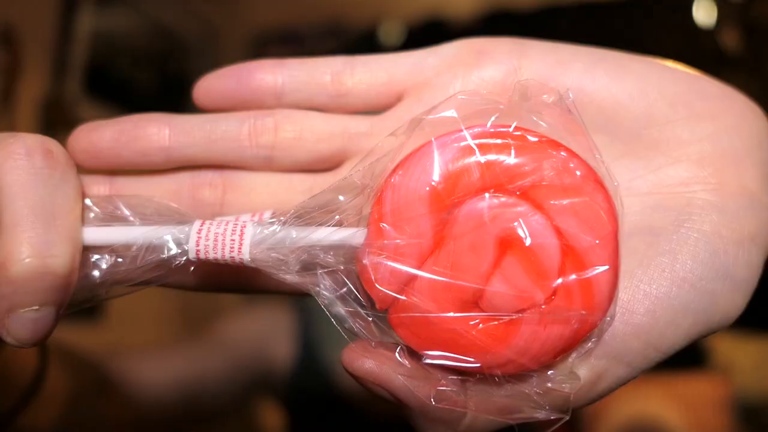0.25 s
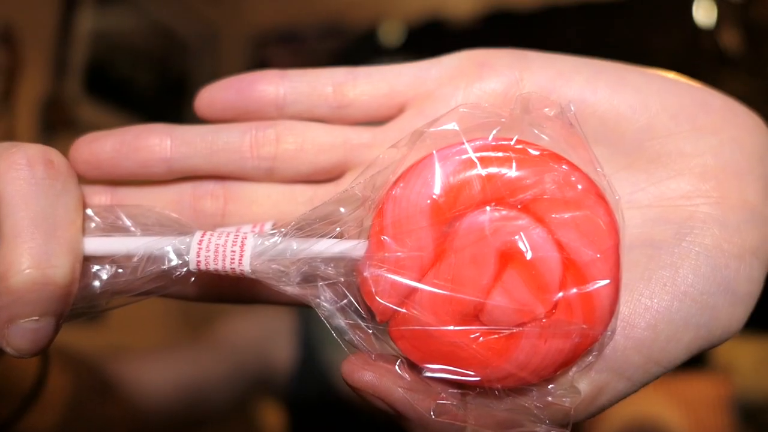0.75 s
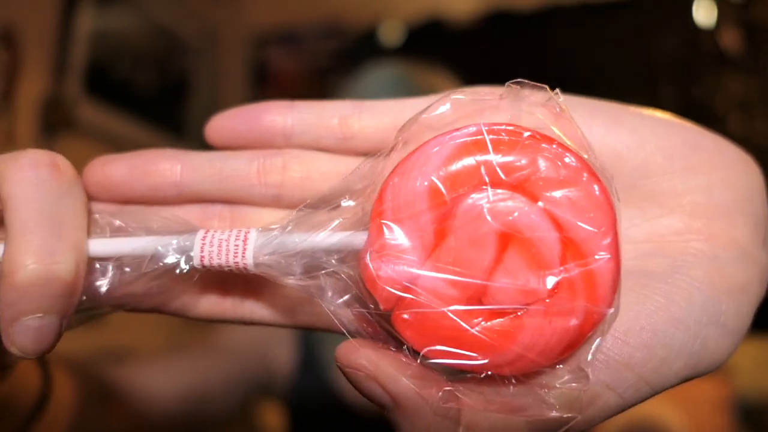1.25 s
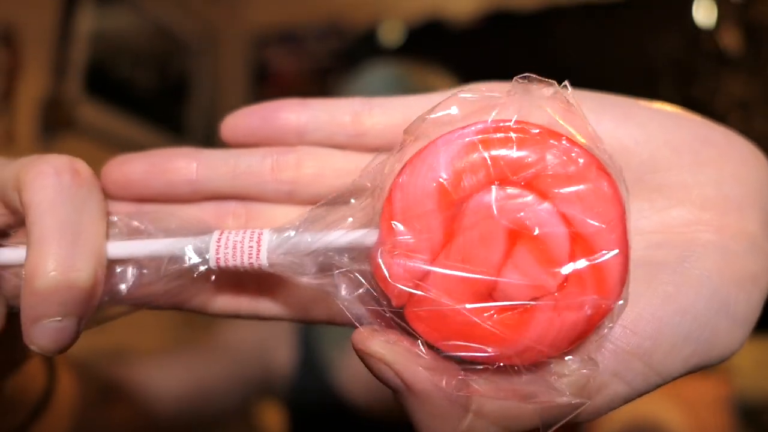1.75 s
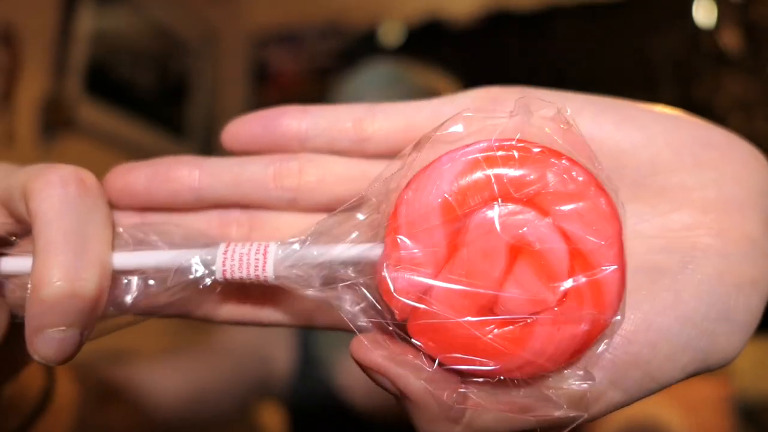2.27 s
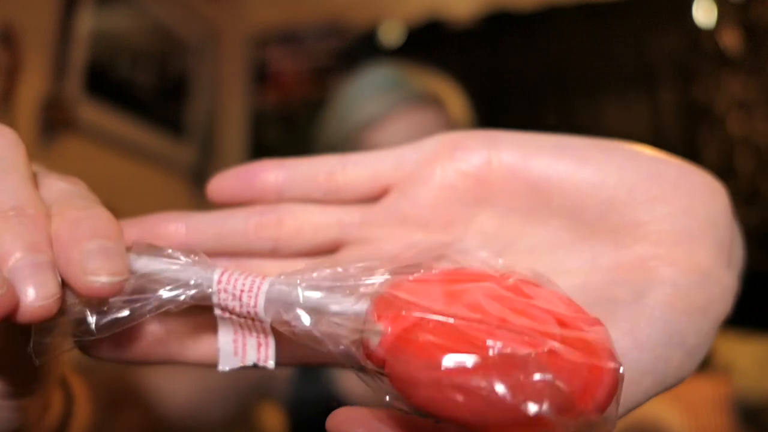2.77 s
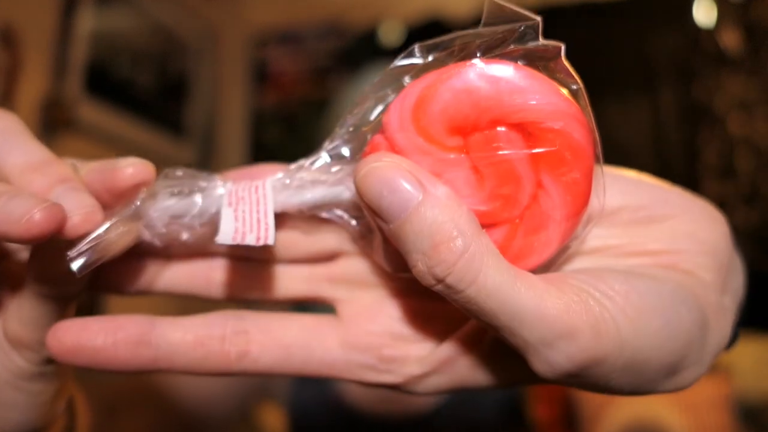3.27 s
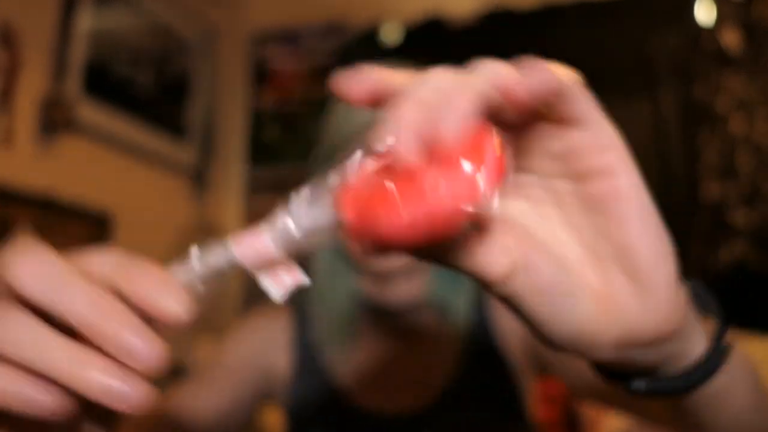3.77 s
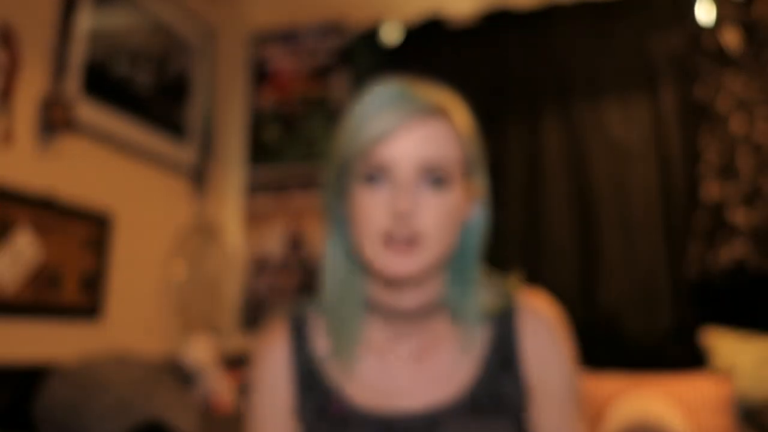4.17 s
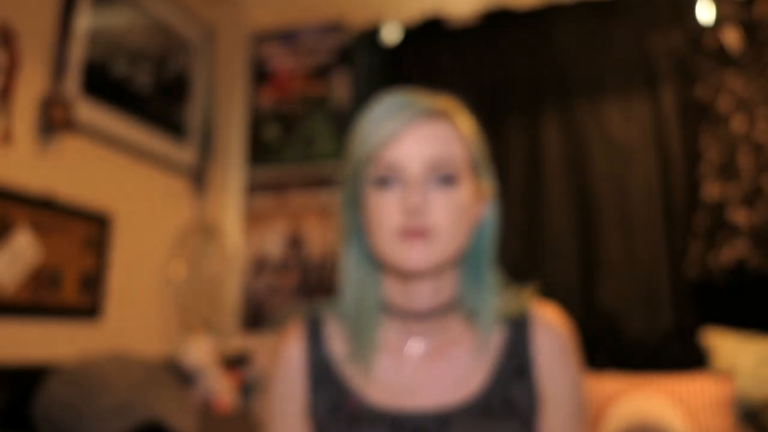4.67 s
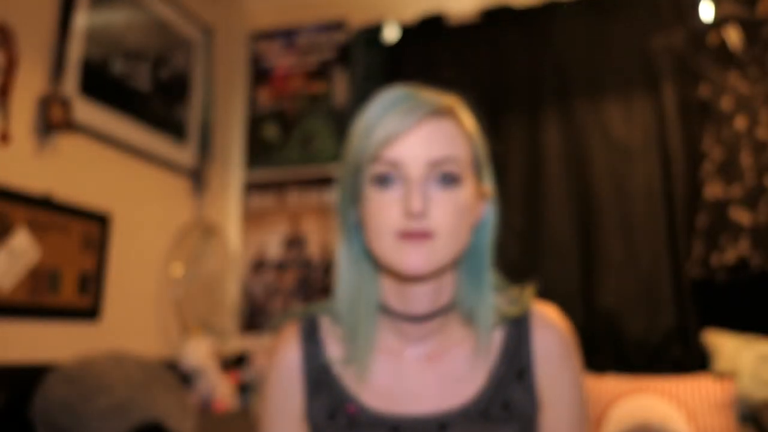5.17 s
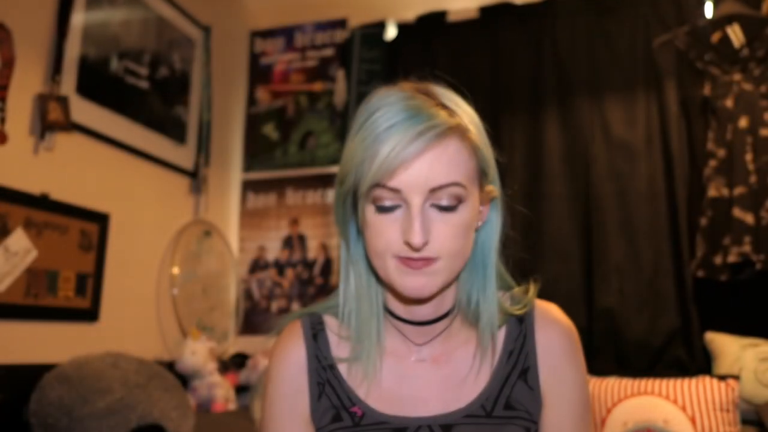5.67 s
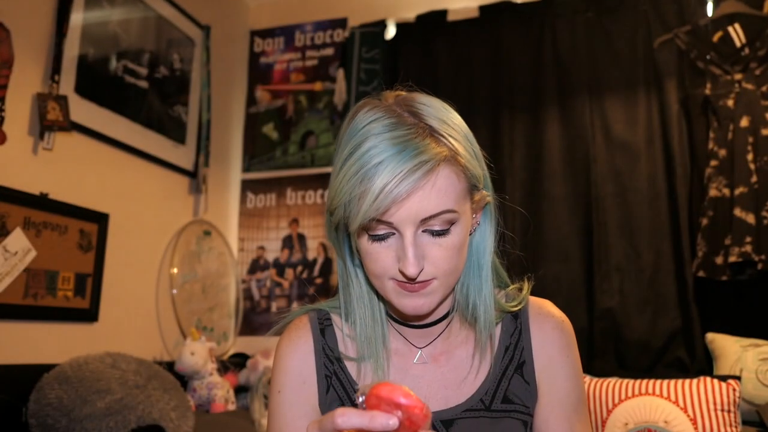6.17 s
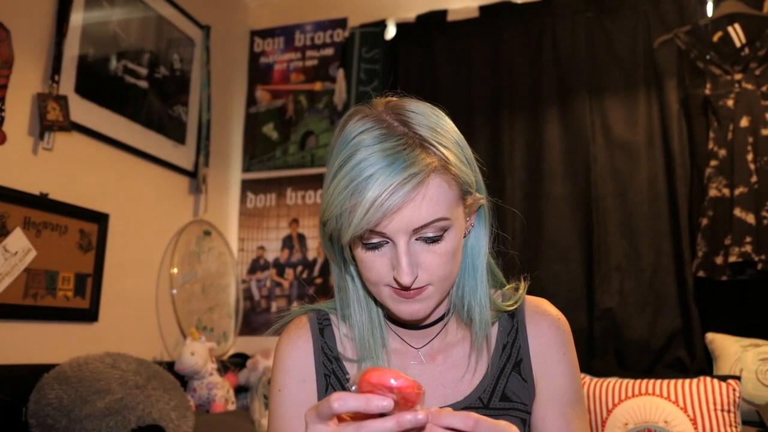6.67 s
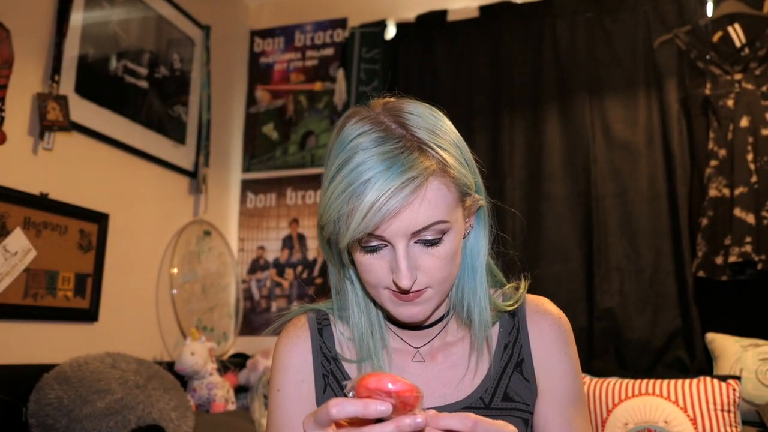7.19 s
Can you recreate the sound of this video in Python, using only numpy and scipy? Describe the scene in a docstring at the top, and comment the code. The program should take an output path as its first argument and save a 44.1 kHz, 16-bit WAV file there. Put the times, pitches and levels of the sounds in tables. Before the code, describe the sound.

Crisp cellophane around a sweet is turned and squeezed in irregular bursts, with sharp clicks and soft finger knocks, before receding into near silence.

```python
"""Small furnished room: a lollipop in a clear plastic wrapper is turned close to a stereo microphone, then lowered.
Snaps: shaped noise pushes ring a film panel, its crease and its stiff edge for about a millisecond.
Crackle: clumped random impulses ring panels of four sizes, with the level following each squeeze.
Bumps: damped band-passed noise, for fingers on the sweet. The room's share grows as the wrapper moves away.
Behind: shaped noise for rumble and microphone hiss, a sine hum, and a short mid-range hiss at the start."""
import sys
import numpy as np
from scipy import signal
from scipy.fft import rfft, irfft, next_fast_len
from scipy.io import wavfile

SR = 44100
rng = np.random.default_rng(int(sys.argv[2]) if len(sys.argv) > 2 else 0)


def file_out(sig):
    """Save sig as 16-bit WAV at sys.argv[1]."""
    # one column per channel
    cols = np.atleast_2d(sig).T
    # limit, then scale
    lim = np.clip(cols, -1, 1)
    pcm = np.round(lim * 32767).astype(np.int16)
    wavfile.write(sys.argv[1], SR, pcm)


N = 327710
TIME = np.arange(N) / SR

# Creases that snap alone or stand out of a squeeze. Each row: start in seconds, level before trim in dB,
# crease ring in dB, edge ring in dB; both rings relative to the panel ring.
SNAP_ROWS = [(.2424, -35, 0, 4), (0.888, -50.5, -9, 4), (.9639, -40, -10, 1), (.986, -28.5, -2.5, -12),
             (1.2167, -37.5, -16, 11), (1.261, -44, -11, 1.5), (1.3783, -47, 4, 6), (1.5047, -38, -4, 0),
             (1.9326, -16, 12.5, 2), (1.936, -17, -33, -6.5), (1.941, -29.5, -1, -7),
             (2.052, -50, -19, -20), (2.21, -46, -14, -21), (2.2628, -30, -6.5, 8), (2.27, -39, -20, -20),
             (2.2805, -20.5, 3.5, -0.5), (2.2945, -29.5, -27, -25), (2.4033, -18.5, 1.5, -4),
             (2.4648, -36, -13, -13), (2.515, -36, -7, -9), (2.5585, -25, -12, 14), (2.5846, -24, -9.5, -3),
             (2.5889, -17.5, 4, 4), (2.5939, -20.5, -13, -14), (2.611, -20.5, -13, 0), (2.68, -28, 1, 6),
             (2.7084, -21, 5.5, 8.5), (2.728, -24.5, -1.5, 7), (2.7436, -20.5, -1, 2.5),
             (2.7689, -23.5, -13, 3), (2.7867, -22, -8, 25.5), (2.8515, -35.5, -13.5, 0.5),
             (2.8668, -33, 7, 9.5), (2.9264, -24.5, 1, 11.5), (2.9952, -21, 12, 5.5),
             (3.0344, -19.5, -30.5, -9.5), (3.0701, -12.5, 2, 6), (3.0814, -21.5, -18, 7),
             (3.0939, -24.5, 7, 8), (3.1285, -17.5, -2.5, 1), (3.1696, -17, -10, 4), (3.219, -24, 1, -7),
             (3.2354, -26, -8, 4), (3.2608, -17.5, 7, 25), (3.267, -15, -2.5, -3.5), (3.2746, -18.5, 4, 3),
             (3.3042, -19.5, 17, 0), (3.3264, -32.5, -12, -8), (3.387, -29.5, -1.5, 4),
             (3.525, -36, 5.5, -3), (3.6008, -26, 11.5, 3), (3.6143, -19.5, 4.5, 8.5), (3.632, -16.5, 1, 2),
             (3.6544, -19.5, 2.5, -9), (3.6826, -18, 0, 6), (3.744, -23, 1.5, 3.5), (3.7986, -27, 4, 12),
             (3.809, -24, 4.5, 4), (3.8302, -21.5, 1.5, 4), (3.9056, -23, -7.5, -5),
             (3.9287, -16.5, 11, 15), (3.9572, -29, -6.5, -18), (3.971, -19.5, 13, 5),
             (4.0378, -27.5, -4.5, -7.5), (4.2862, -25.5, 12.5, 15), (4.425, -46, -4.5, -13.5),
             (4.5937, -26.5, 1, 23), (4.7113, -31.5, -3, -4), (4.816, -33.5, -21.5, 7.5),
             (4.9092, -38, -3, -7.5), (4.987, -44.5, -4, -6.5), (5.0442, -34.5, -3.5, -2.5),
             (5.149, -38, -.5, 1.5), (5.3492, -46, -4, 0), (5.5664, -39.5, -2, 0), (5.6452, -33, 3, 5),
             (5.7588, -25, 1.5, 2.5), (5.85, -23, 23.5, 31.5), (6.113, -44, 1.5, 0), (6.2653, -42, 0, 3),
             (6.4333, -39, 15, 9.5), (6.558, -41, -1.5, -2.5), (6.7557, -42.5, -2, -6),
             (6.965, -53, -9, -11), (7.272, -46.5, -5, -2), (7.3531, -32, -5.5, -2),
             (7.4188, -41.5, -4, 12)]
# Squeezes of the hand. Each row: time of reaching full level in seconds, length in seconds, level in dB.
SQUEEZE_ROWS = [(.002, 0.0029, -48), (0.937, 0.049, -55.5), (2.268, 0.016, -50.5), (2.549, 0.13, -34.5),
                (2.719, 0.09, -35), (2.992, 0.035, -40.5), (3.064, .015, -29), (3.118, 0.02, -33),
                (3.232, .06, -37.5), (3.617, 0.079, -31.5), (3.817, 0.027, -30), (3.904, 0.1, -37),
                (4.076, 0.053, -36), (4.132, 0.031, -30.5), (4.204, 0.048, -35), (4.285, 0.0078, -31),
                (4.336, 0.012, -36.5), (4.499, 0.12, -37.5), (4.714, 0.025, -42.5), (4.76, .1, -49),
                (4.919, .12, -59), (5.744, 0.021, -37), (5.807, 0.04, -44), (5.887, 0.0071, -37.5),
                (6.422, 0.052, -52), (7.354, 0.0068, -43.5)]
# Tautness of the film, heard as panel pitch. Each row: time in seconds, mean panel pitch in Hz.
PANEL_PITCH = [(.2, 2170), (1.0, 2680), (1.93, 2330), (2.25, 2710), (2.45, 2547), (2.8, 2780), (3.1, 2510),
               (3.7, 2944), (3.92, 2066), (4.25, 2990), (4.8, 2838), (5.1, 2350), (7.4, 2200)]
# Fingers bumping the sweet and its stick. Each row: start in seconds, level before trim in dB, pitch in Hz.
BUMP_ROWS = [(0.146, -46.5, 890), (0.985, -40.5, 1190), (1.933, -35.5, 803), (2.729, -47, 613.7),
             (3.243, -40, 230), (3.266, -35, 804), (3.655, -39, 650), (3.922, -36.5, 564),
             (4.284, -37, 406), (5.756, -44, 720), (5.893, -44.5, 555)]
# Distance from the microphone. Each row: time in seconds, gain of the sound sent to the room in dB.
ROOM_SEND = [(0, -9), (1.9, -13.5), (3.3, -15.5), (3.9, -7), (4.3, -7.5), (5.2, 0.5), (5.8, -4.5),
             (7.4, -0.5)]
# Tone of the whole film. Each row: frequency in Hz, gain in dB.
FILM_TONE_GAIN = [(60, 6), (300, -0.5), (850, -3.5), (1300, 2.5), (2200, -1), (3600, 1.5), (4700, -2),
                  (6500, -1.5), (8200, -2.5), (10000, 0), (13000, -6), (16000, -5.5)]
# Tone of the scattered and room sound that differs between channels. Each row: frequency in Hz, gain in dB.
SIDE_TONE = [(150, -6), (400, -7), (700, -10.5), (1300, -14.5), (2400, -22.5), (4400, -15.5), (8000, -25),
             (15000, -9.5)]
# Still room, common to both channels. Each row: frequency in Hz, relative density in dB per Hz.
AIR_MID_TONE = [(25, -17.5), (60, -14), (95, -4.5), (115, -2.5), (150, 4.5), (260, 1), (450, -3),
                (1100, -11), (2500, -15), (4800, -21), (5200, -15.5), (11000, -19.5), (16000, -30)]
# Still room, differing between channels. Each row: frequency in Hz, relative density in dB per Hz.
AIR_SIDE_TONE = [(25, -37.5), (60, -27), (100, -6.5), (170, -0.5), (290, -1), (500, -4), (1100, -12.5),
                 (2400, -21), (4500, -30.5), (10000, -33.5), (16000, -42.5)]

ATTACK_S_PER_20_DB, SAG_DB_PER_S, RELEASE_DB_PER_S = 0.01035, 16, 425.5
SETTLE_DB, SETTLE_DB_PER_S = -21, 43
GRIP_START_S, GRIP_END_S = 4.2, 5.4  # fingertips hold the sweet itself
AIR_MID_DB, AIR_SIDE_DB = -59, -52.5
HUM_HZ, HUM_DB = 92, -79.5
TOP_HZ = 16000


def snaps(squeeze, slip_s=0.00018, flutter_s=0.018, flutter_db=-33, trim_db=-9, variety=0.054):
    """A crease gives way in a brief swell of micro-slips; the sheet then flutters faintly."""
    out = np.zeros(N)
    t = TIME[:1024]
    slips = (t / slip_s) ** 2 * np.exp(-t / slip_s)
    release = slips + undb(flutter_db) * np.exp(-t / flutter_s)
    for start_s, level_db, crease_db, edge_db in list(SNAP_ROWS) + lesser_snaps(squeeze):
        stiffness = 1 + variety * rng.uniform(-1, 1)  # no two creases are folded alike
        panel_hz = stiffness * np.interp(start_s, *np.transpose(PANEL_PITCH))
        pushes = release * rng.standard_normal((4, len(t)))
        rings = film(pushes, panel_hz, spread=1.27, skirt_db=-14, stiffness=stiffness, ring_spread=1.208)
        snap = mix_rings(rings, crease_db, edge_db)
        add(out, start_s, undb(level_db + trim_db) * unit(snap))
    return out


def lesser_snaps(squeeze, above_db=5, scatter_db=3, crease_db=-3, edge_db=2, tint_db=7):
    """Middling creases give way at random, more of them the harder the film is worked; rows as in SNAP_ROWS."""
    moments = chance_moments(squeeze, np.sqrt(squeeze), count=48)
    tints = rng.uniform(-tint_db, tint_db, (len(moments), 2))
    return [(start_s, effort_db + above_db + scatter_db * luck, crease_db + tint[0], edge_db + tint[1])
            for (start_s, effort_db, luck), tint in zip(moments, tints)]


def crackle(squeeze, per_s=1700, scatter_db=3, weaken_db=22, crease_db=-1, edge_db=-1, trim_db=-1):
    """Crowds of tiny creases on panels of four sizes come in clumps, each with its own balance of rings."""
    crowd = np.zeros(N)
    for panel_hz in (2110, 2430, 2980, 3730):
        avalanche = clumps(hold_s=.003, spread_db=9)  # one crease sets off its neighbours
        struck = rng.random(N) < per_s / 4 / SR
        scatter = undb(scatter_db * np.clip(rng.standard_normal(N), -2, 2))
        sizes = struck * avalanche * scatter
        pushes = [sizes * rng.choice([-1, 1], N) * undb(-weaken_db * rng.random(N)) for _ in range(4)]
        stiffness = np.sqrt(panel_hz / 2600)  # a smaller panel's upper rings lie higher too
        rings = film(pushes, panel_hz, spread=1.377, skirt_db=-7, stiffness=stiffness, ring_spread=1.17)
        crowd += mix_rings(rings, crease_db, edge_db)
    return undb(trim_db) * unit(crowd) * squeeze


def film(pushes, panel_hz, spread, skirt_db, stiffness, ring_spread):
    """Three resonances: a whole panel (with a weak low skirt), the crease, its stiff edge."""
    crease_hz, edge_hz = 6600 * stiffness, 10400 * stiffness
    skirt = undb(skirt_db) * band(pushes[3], lo_hz=430, hi_hz=1820, order=1)
    panel = band(pushes[0], panel_hz / spread, panel_hz * spread) + skirt
    crease = band(pushes[1], crease_hz / ring_spread, crease_hz * ring_spread)
    edge = band(pushes[2], edge_hz / ring_spread, edge_hz * ring_spread)
    return panel, crease, edge


def mix_rings(rings, crease_db, edge_db):
    """Sum panel, crease and edge, the last two at levels relative to the panel."""
    panel, crease, edge = rings
    return unit(panel) + undb(crease_db) * unit(crease) + undb(edge_db) * unit(edge)


def effort():
    """Crumpling gain: the strongest squeeze, each building fast, sagging while held, dying, then settling."""
    effort_db = np.full(N, -120.)
    for start_s, length_s, level_db in SQUEEZE_ROWS:
        since_s = TIME - start_s
        held_s = np.clip(since_s, 0, length_s)
        after_s = np.maximum(since_s - length_s, 0)
        rise_db = 20 * np.minimum(since_s, 0) / ATTACK_S_PER_20_DB  # leads up to start_s
        fall_db = np.maximum(-RELEASE_DB_PER_S * after_s, SETTLE_DB - SETTLE_DB_PER_S * after_s)
        effort_db = np.maximum(effort_db, level_db + rise_db - SAG_DB_PER_S * held_s + fall_db)
    return undb(effort_db)


def bumps(squeeze, decay_s=0.0031, spread=1.49, trim_db=-8):
    """Soft, quickly damped knocks of fingers on the sweet: decaying noise through a resonance."""
    out = np.zeros(N)
    for start_s, level_db, hz in list(BUMP_ROWS) + lesser_bumps(squeeze):
        knock = band(burst(decay_s, size=2048), hz / spread, hz * spread)
        add(out, start_s, undb(level_db + trim_db) * unit(knock))
    return out


def lesser_bumps(squeeze, offset_db=-10, pitch_hz=450, spread=1.1):
    """Fingertips pat the sweet at random as they shift their grip; rows as in BUMP_ROWS."""
    gripping = (TIME > GRIP_START_S) & (TIME < GRIP_END_S)
    moments = chance_moments(squeeze, np.sqrt(squeeze) * gripping, count=20)
    return [(start_s, effort_db + offset_db, pitch_hz * spread ** luck) for start_s, effort_db, luck in moments]


def chance_moments(squeeze, weight, count):
    """Random moments, crowded where weight is high. Each row: time in seconds, effort in dB, luck -1 to 1."""
    draws = rng.random((count, 2))
    share = np.cumsum(weight) / np.sum(weight)
    targets = (np.arange(count) + draws[:, 0]) / count
    at = np.minimum(np.searchsorted(share, targets), N - 1)
    return np.column_stack([TIME[at], 20 * np.log10(squeeze[at]), 2 * draws[:, 1] - 1])


def sideways(x, smear_s=0.0011):
    """Scattering from the nearby hands makes the two capsules differ."""
    return reflect(x, np.exp(-TIME[:512] / smear_s), hold_s=.02)


def room(x, t60_s=0.15, gap_s=0.00028):
    """The short tail of a small furnished room, building up just after the direct sound."""
    t = np.arange(SR // 4) / SR
    decay = undb(-60 * t / t60_s)
    buildup = 1 - np.exp(-(t / gap_s) ** 2)
    return reflect(x, decay * buildup, hold_s=.08)


def reflect(x, envelope, hold_s):
    """Dense reflections under an envelope; the wrapper keeps moving, so their pattern is new every hold_s."""
    out, hop = np.zeros(N), int(hold_s * SR)
    for start in range(0, N, hop):
        echoes = envelope * rng.standard_normal(len(envelope))
        echoes /= np.linalg.norm(echoes)
        add(out, start / SR, signal.fftconvolve(x[start:start + hop], echoes))
    return out


def opening_hiss(level_db=-60, end_s=0.24):
    """A faint, wavering band of mid-range noise that stops abruptly."""
    hiss = band(rng.standard_normal(N), lo_hz=1140, hi_hz=3220)
    waver = clumps(hold_s=.02, spread_db=3)
    return undb(level_db) * unit(hiss * waver) * (TIME < end_s)


def air(points, level_db):
    """Steady room rumble under microphone hiss: shaped noise."""
    return undb(level_db) * unit(colour(rng.standard_normal(N), points))


def hum():
    """A faint low hum in the room: one sine."""
    return undb(HUM_DB) * unit(np.sin(2 * np.pi * HUM_HZ * TIME))


def undb(db):
    """Decibels to gain."""
    return 10 ** (np.asarray(db) / 20)


def curve(rows):
    """Gain over time from rows of seconds and dB."""
    return undb(np.interp(TIME, *np.transpose(rows)))


def unit(x):
    """Scale to rms 1."""
    return x / np.sqrt(np.mean(x ** 2) + 1e-30)


def band(x, lo_hz, hi_hz, order=2):
    """Causal band-pass: a resonance that rings for about one over its width."""
    edges_hz = np.clip([lo_hz, max(hi_hz, lo_hz * 1.1)], 10, [.4 * SR, .48 * SR])
    return signal.lfilter(*signal.butter(order, edges_hz, "band", fs=SR), x)


def colour(x, points):
    """Shape a spectrum by rows of Hz and dB, interpolated over log frequency."""
    hz, db = np.transpose(points)
    size = next_fast_len(len(x))
    bins_hz = np.maximum(np.fft.rfftfreq(size, 1 / SR), 1)
    gain = undb(np.interp(np.log(bins_hz), np.log(hz), db))
    return irfft(rfft(x, size) * gain, size)[:len(x)]


def add(track, start_s, sound):
    """Mix a short sound into the track."""
    start = int(np.clip(start_s * SR, 0, N - 1))
    track[start:start + len(sound)] += sound[:N - start]


def burst(decay_s, size):
    """Noise that dies away with the given time constant."""
    return rng.standard_normal(size) * np.exp(-np.arange(size) / SR / decay_s)


def clumps(hold_s, spread_db):
    """Gain that glides to a new random level every hold_s."""
    knots_s = np.arange(0, N / SR + hold_s, hold_s)
    return undb(spread_db * np.interp(TIME, knots_s, rng.uniform(-1, 1, len(knots_s))))


def scene():
    """Wrapper and fingers, their room sound and the still air, as left and right."""
    squeeze = effort()
    wrapper = colour(snaps(squeeze) + crackle(squeeze), FILM_TONE_GAIN)
    direct = wrapper + bumps(squeeze)
    sent = direct * curve(ROOM_SEND)  # the further off, the larger the room's share
    mid = direct + room(sent) + opening_hiss() + air(AIR_MID_TONE, AIR_MID_DB) + hum()
    spread = undb(6) * sideways(direct) + undb(7.5) * room(sent)
    side = colour(spread, SIDE_TONE) + air(AIR_SIDE_TONE, AIR_SIDE_DB)
    return np.array([mid + side, mid - side])


def record(dry, ceiling=.85):
    """The recorder rounds the sharpest peaks, then cuts the top."""
    rounded = ceiling * np.tanh(dry / ceiling)
    low_pass = signal.ellip(10, .2, 90, TOP_HZ, fs=SR, output="sos")
    return signal.sosfilt(low_pass, rounded)


dry = scene()
out = record(dry)
file_out(out)
```